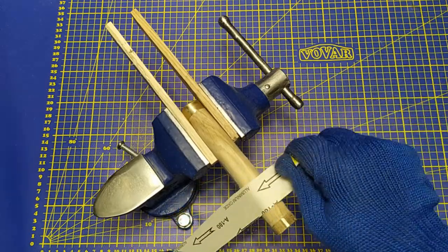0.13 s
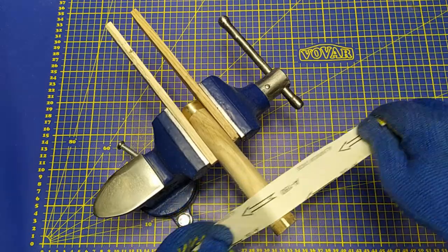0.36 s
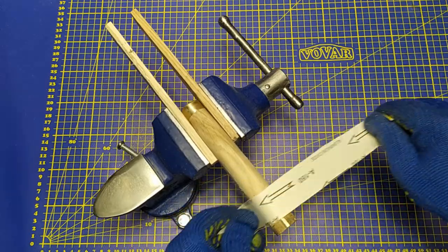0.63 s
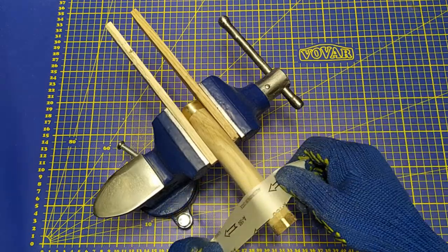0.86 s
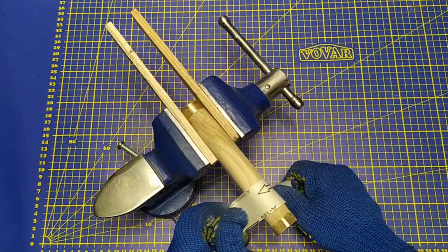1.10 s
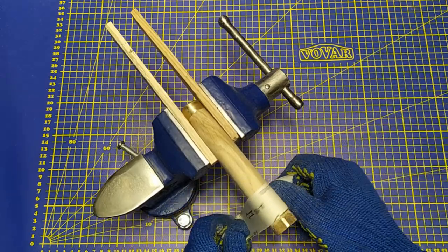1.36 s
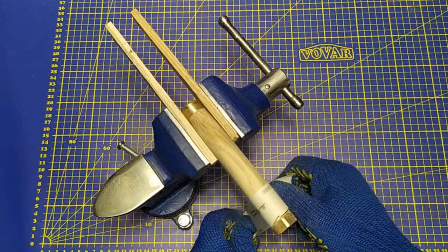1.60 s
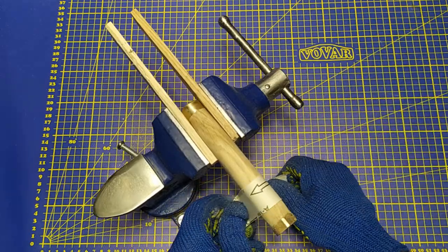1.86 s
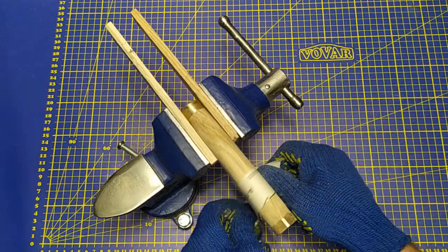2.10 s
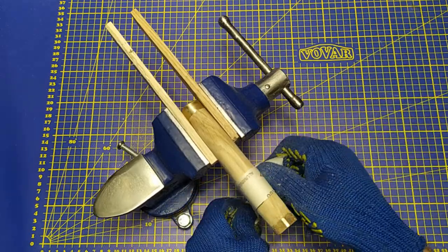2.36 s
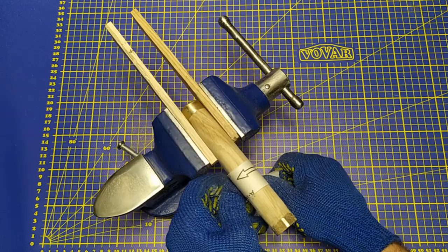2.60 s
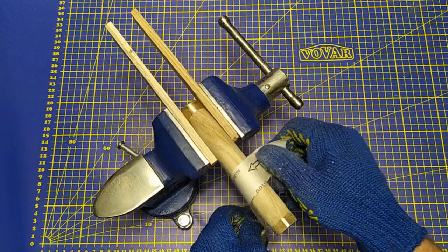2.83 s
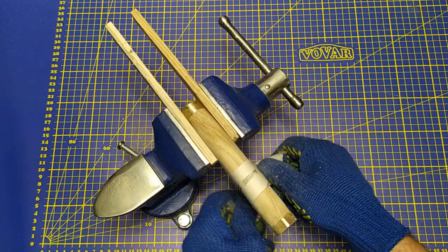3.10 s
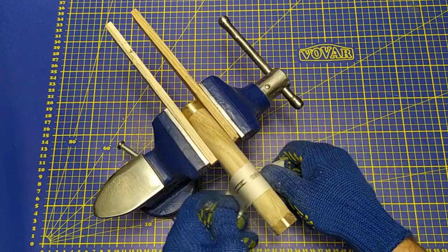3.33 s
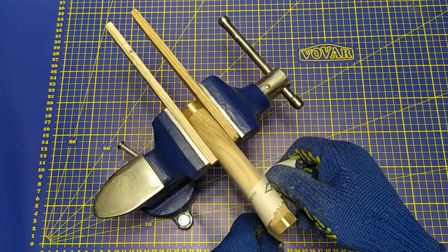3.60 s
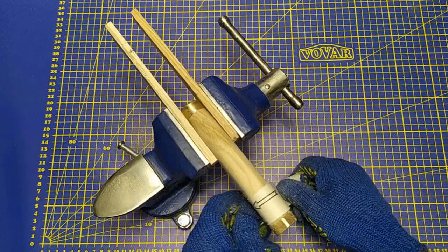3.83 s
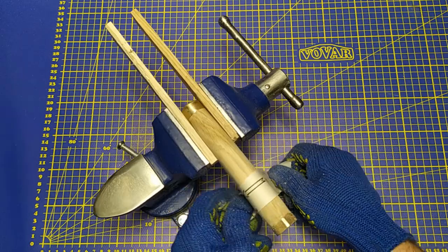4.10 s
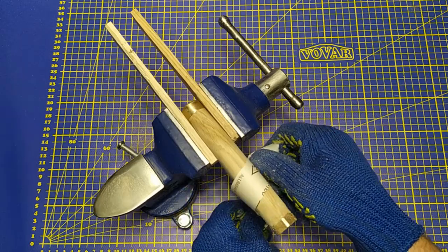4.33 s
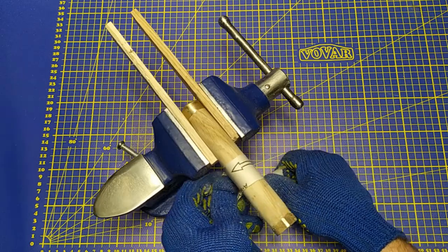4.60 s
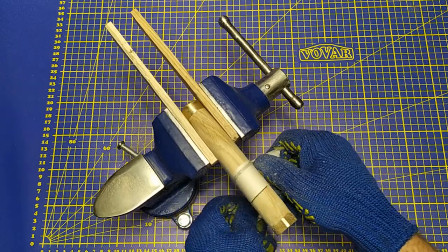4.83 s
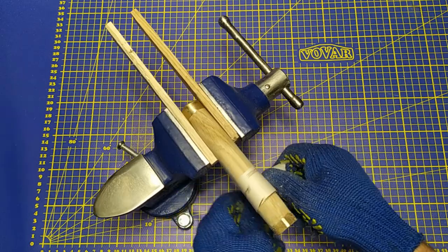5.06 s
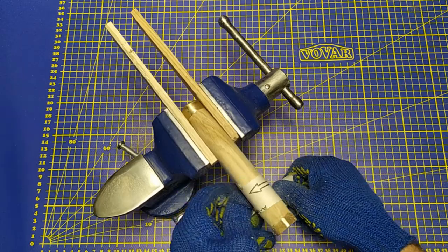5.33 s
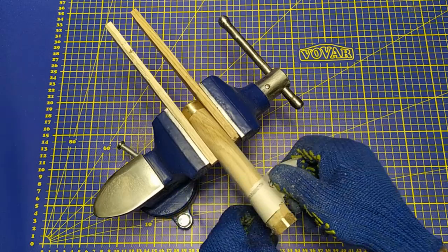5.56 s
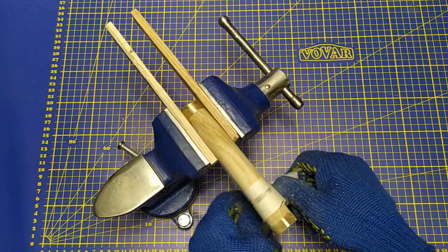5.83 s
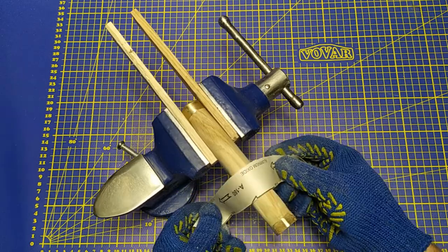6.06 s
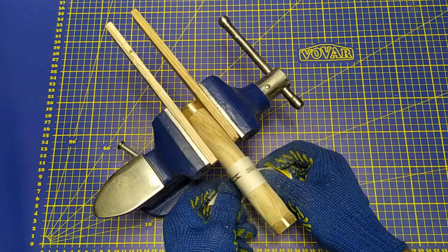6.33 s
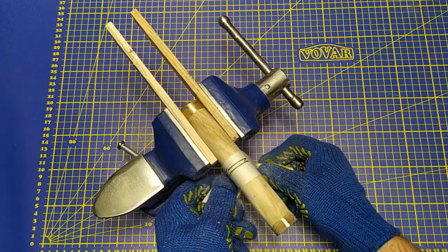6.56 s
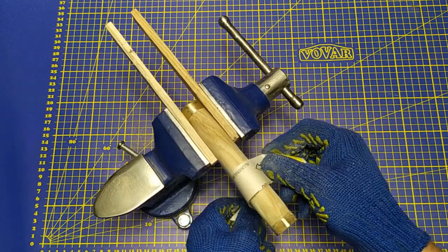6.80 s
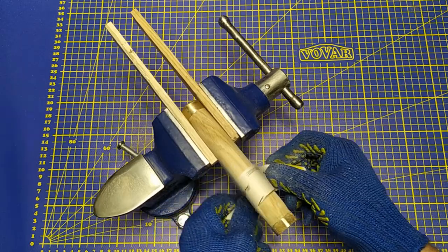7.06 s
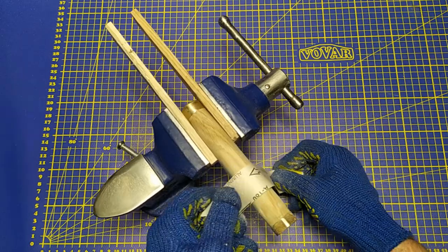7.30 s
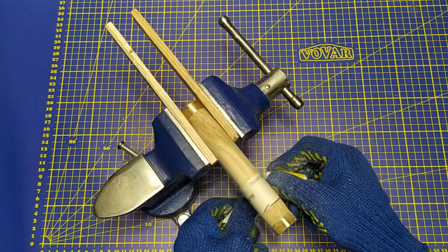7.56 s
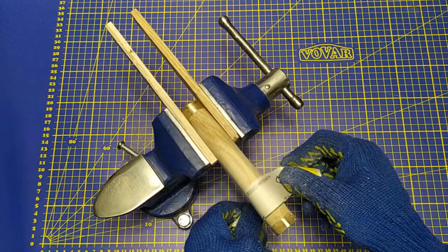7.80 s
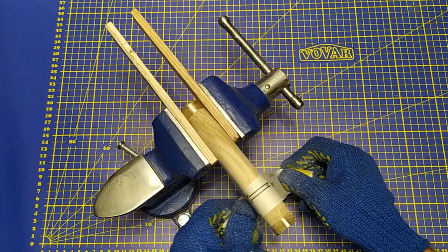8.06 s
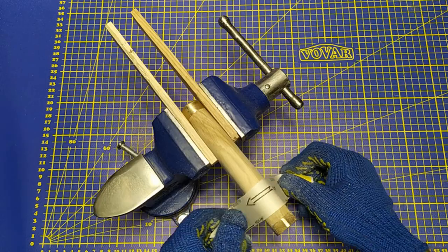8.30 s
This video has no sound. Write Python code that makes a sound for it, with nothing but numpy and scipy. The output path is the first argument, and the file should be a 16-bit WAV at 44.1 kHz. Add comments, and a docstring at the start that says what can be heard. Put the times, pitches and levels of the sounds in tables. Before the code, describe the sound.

Sanding is already under way at 0 s: a strip of sandpaper rubs back and forth around a clamped wooden handle, close and dry, in a small workshop. Each stroke is a short gritty rasp of about 0.15 s, bright and hissy with a faint hollow wooden ring, swelling quickly and choking off at the turn. Five or six come each second, slightly uneven. Soft low bench thuds fall at many turns. From 3 to 3.6 s the strokes grow fuller, with a firmer thump near 3.4 s; the heaviest thuds come near 4.9 and 5.7 s. Around 6.1 s the rubbing and bench ring stop abruptly, with small dry wood ticks in the gap. A slower-swelling, longer scrape starts at 6.2 s, then lighter, quicker, regular strokes run on to about 8.4 s, with only gentle bench nudges. A quiet low room hum lies beneath throughout.

```python
"""Sanding a wooden handle

A strip of sandpaper is pulled to and fro round a handle held in a bench vice, about five strokes a second.
Grit tears the wood in dense tiny clicks that ring the paper and the handle; at many turns the hands jolt
the bench, whose low modes thud. Noise and narrow wavering bands make a small workshop's quiet low hum;
a few dry wood ticks are decaying sines. Heard by a close pair of microphones.
"""
import sys
import numpy as np
from scipy import signal
from scipy.fft import rfft, irfft, next_fast_len
from scipy.io import wavfile
from scipy.ndimage import uniform_filter1d

SR = 44100
rng = np.random.default_rng(int(sys.argv[2]) if len(sys.argv) > 2 else 0)


def volts_from_decibels(level):
    """Turn decibel levels (scalar or array-like) into linear amplitude factors."""
    exponent = np.asarray(level, float) / 20
    return 10 ** exponent


def transcribe(signal):
    """Save signal, clipped to [-1, 1], as a 16-bit WAV file at the path in sys.argv[1]."""
    frames = np.atleast_2d(signal).T
    limited = np.clip(frames, -1, 1)
    pcm = np.round(limited * 32767).astype(np.int16)
    wavfile.write(sys.argv[1], SR, pcm)


N = 371322
T = np.arange(N) / SR
SIDES = np.array([[1], [-1]])  # left, right
STOP_S = 6.125  # earlier strokes, bench rings and room tails stop dead here

# strokes of the strip: start_s, slowing_s, rasp_db, speed_up_s, brightness_db
STROKES = [(-0.128, -0.003, -24.5, 0.021, -2.2), (0.021, 0.141, -23.3, 0.014, -2.2),
           (0.187, 0.314, -24, 0.014, -3.5), (0.347, 0.478, -22, 0.026, -6), (0.53, 0.666, -23, 0.02, -2.5),
           (0.7, 0.875, -24, 0.018, -5), (0.908, 1.07, -22, 0.032, -1), (1.125, 1.275, -21.8, 0.03, -1),
           (1.307, 1.462, -22.5, 0.027, 2), (1.504, 1.649, -22, 0.035, 4), (1.693, 1.854, -23.5, 0.026, 4),
           (1.89, 2.025, -23, 0.015, 1), (2.066, 2.203, -24, 0.018, 3.5), (2.233, 2.365, -22.5, 0.031, 0.5),
           (2.427, 2.569, -23, 0.021, 0.5), (2.61, 2.774, -22.5, 0.033, -3.5),
           (2.83, 2.97, -21.5, 0.032, 0), (3.004, 3.168, -20.5, 0.059, 0), (3.192, 3.353, -18, 0.077, 0.2),
           (3.403, 3.575, -21.3, 0.048, 0), (3.627, 3.768, -20, 0.018, -0.5),
           (3.81, 3.961, -21.5, 0.032, 2.5), (4.017, 4.144, -23.0, 0.016, 4.5),
           (4.165, 4.312, -22.5, 0.024, -1.5), (4.375, 4.509, -22, 0.018, 1.5),
           (4.534, 4.716, -22, 0.042, -4.5), (4.779, 4.91, -18.5, 0.051, 1.5),
           (4.985, 5.134, -23, 0.024, -2), (5.182, 5.306, -20.5, 0.019, 0.5),
           (5.363, 5.501, -22.5, 0.014, -0.5), (5.551, 5.672, -21.5, 0.019, 1),
           (5.708, 5.902, -22.5, 0.038, 2.5), (5.949, 6.085, -21.0, 0.025, 2.5),
           (6.228, 6.422, -20.5, 0.17, 2), (6.485, 6.613, -26, 0.01, -1.3),
           (6.664, 6.785, -23.5, 0.017, -2.0), (6.828, 6.968, -22, 0.018, 2.5),
           (7.005, 7.145, -24.5, 0.014, -3), (7.184, 7.304, -23, 0.015, 1.5),
           (7.355, 7.482, -23.0, 0.017, 1.5), (7.516, 7.66, -21.5, 0.02, 3.5),
           (7.707, 7.852, -24, 0.017, -1), (7.897, 8.012, -22, 0.011, 4.5),
           (8.062, 8.181, -23.5, 0.014, 1.5), (8.231, 8.35, -24, 0.0079, 3.5),
           (8.398, 8.499, -27, 0.007, 3)]
# grit snags and tears harder for a moment: centre_s, extra_db, length_s
SNAGS = [(0.741, 2.5, .028), (2.14, 1.5, .02), (3.69, 0, .02), (5.428, 4.5, 0.01), (6.267, 3, 0.015),
         (6.363, 2.5, 0.03), (6.535, 2, .04)]
# spectrum of the tearing: pitch_hz, density_db_per_hz
RASP_SPECTRUM = [(600, -34), (1000, -23.5), (1500, -20), (2200, -14), (2800, -10), (3400, -5.5), (4300, -3),
                 (6000, -4), (7800, -1.5), (10200, -4.5), (11700, -12.5), (12800, -20.5), (13100, -67)]
# left minus right of the tearing: pitch_hz, difference_db
LEAN = [(500, 4.5), (1000, 0), (2200, 0.3), (4500, 0.6), (8000, -4), (12000, 0)]
# resonances of the taut paper: pitch_hz, width_hz, level_db
PAPER_MODES = [(3400, 97, -12), (4170, 460, -11.5), (5200, 110, -31), (7540, 900, -14), (9330, 177, -6)]
# modes of the clamped handle: pitch_hz, width_hz, level_db
HANDLE_MODES = [(645, 580, -14), (995, 60, -9), (1168, 20, -2.5), (1436, 35, -11.5), (1696, 37, 7.5),
                (1839, 61, 3), (2150, 21, -11)]
# handle ring, drifting as the strip wanders along it: time_s, level_db
HANDLE_RING = [(0.0, -44.5), (1.0, -46.5), (2.0, -46), (2.7, -48.5), (3.2, -50), (3.9, -44.5), (4.8, -50.5),
               (5.6, -44), (6.5, -48.5), (7.3, -46.5), (7.8, -44.5), (8.42, -45.5)]
# hard jolts of the bench: time_s, level_db, share_above_160_hz_db
JOLTS = [(0.015, -40, -10), (0.183, -38, -17), (0.356, -33, -26), (0.713, -38, -6), (0.867, -36.5, -13),
         (1.275, -31, -12), (1.846, -35.5, -13), (2.021, -35.5, -11), (2.2, -31, -9), (2.56, -32.5, -10),
         (2.775, -35, -13), (2.967, -30.5, -10.5), (3.168, -31.5, -14), (3.365, -26.5, -12),
         (3.763, -36, -7), (4.144, -37.5, -7), (4.506, -35, -8), (4.718, -33.5, -19), (4.926, -23, -18),
         (5.316, -29, -19), (5.495, -38, -7), (5.675, -22, -15.5), (5.89, -38, -6), (6.095, -29.5, -5.5)]
# modes of the bench top: pitch_hz, level_db, t60_s
BENCH_MODES = [(57, 3.5, 0.41), (95, 4.5, 0.16), (102.4, 5.5, 0.26), (120, -0.5, 0.21), (145, -7.5, 0.33),
               (175.2, 1, 0.25), (231.5, -0.5, 0.23), (335, 0, 0.19), (395, 2.5, 0.088)]
# bench rocking under the pull: time_s, lowest_mode_db, second_mode_db
ROCK = [(0.0, -43, -56), (0.43, -56, -43.5), (1.24, -50.5, -53), (2.59, -56, -54), (3.0, -44, -61),
        (3.4, -45, -49), (4.23, -64, -56.5), (5.01, -45.5, -51), (5.76, -44.5, -47), (6.12, -41, -52),
        (6.13, -54, -54), (6.42, -74, -55), (6.9, -42, -57), (7.3, -53, -51.5), (8.42, -53, -50.5)]
# spectrum of the room noise: pitch_hz, density_db_per_hz
SHOP_SPECTRUM = [(76, -31), (130, -2), (204, -19.5), (253, -5.5), (298, -13), (409, 0), (462, -10),
                 (635, -2.5), (711, -11), (996, -4), (1160, -9), (1250, -10), (1500, -11), (1950, -36),
                 (3300, -120)]
# slow swell of the room noise: time_s, level_db
SHOP_SWELL = [(0.0, -48.5), (0.68, -52), (3.7, -54), (4.17, -50), (4.62, -54), (8.42, -53)]
# narrow hums: pitch_hz, width_hz, level_db
HUMS = [(40, 8.4, -59), (135, 21, -67.5), (170, 8.8, -63.5), (247.7, 8.1, -63), (435, 13, -68.5),
        (507.6, 12.5, -64.5), (647.4, 13, -66)]
# wood ticks, one ring a row: time_s, level_db, pitch_hz, t60_s
TICKS = [(6.087, -37, 375, 0.025), (6.173, -36.5, 1270, 0.022), (6.173, -44, 600, 0.012)]


def level(x, rms_db):
    """Scale to an rms level."""
    return x * volts_from_decibels(rms_db) / np.sqrt(np.mean(x ** 2))


def colour(x, points):
    """Shape the spectrum by (Hz, dB) points, joined along log frequency."""
    hz, db = np.transpose(points)
    size = next_fast_len(N)
    bins_hz = np.maximum(np.fft.rfftfreq(size, 1 / SR), 1)
    gain_db = np.interp(np.log(bins_hz), np.log(hz), db)
    return irfft(rfft(x, size) * volts_from_decibels(gain_db), size)[..., :N]


def ring(x, hz, width_hz):
    """One resonance, gain 1 at its centre."""
    return signal.lfilter(*signal.iirpeak(hz, hz / width_hz, fs=SR), x)


def decay(t, t60_s):
    """Exponential fall of 60 dB in t60_s."""
    return np.exp(-np.log(1000) * t / t60_s)


def walk(rate_hz):
    """Random levels held 1 / rate_hz s and slewed twice; spread about 0.7."""
    hold = int(SR / rate_hz)
    steps = np.repeat(rng.standard_normal(N // hold + 1), hold)
    return 0.98 * uniform_filter1d(uniform_filter1d(steps, hold), hold)[:N]


def curve(table):
    """Columns of a (s, ..) table at every sample."""
    s, *columns = np.transpose(table)
    return [np.interp(T, s, column) for column in columns]


def strokes():
    """Rasp level and brightness in dB: each stroke speeds up, slackens, brakes; the next starts over its tail."""
    creep_db = -49.5  # the paper never lies quite still
    ease = 1.48  # exponent: the hands start gently, then speed up
    sag_db_per_s, slowing_db_per_s = 13, 343  # the pull slackens; the rasp dies as the hands brake
    grip_s, slip_s = 0.005, 0.004  # after a turn the grit holds for a moment, then breaks loose
    power, bright_db = np.full(N, volts_from_decibels(2 * creep_db)), np.zeros(N)
    for start_s, brake_s, rasp_db, rise_s, stroke_bright_db in STROKES:
        limit_s = STOP_S if start_s < STOP_S else N / SR
        end_s = min(brake_s + 0.2, limit_s)
        now = slice(max(int(start_s * SR), 0), int(end_s * SR))
        t = np.maximum(T[now] - start_s, 0)
        braking_s = np.maximum(T[now] - brake_s, 0)
        pull_db = rasp_db - sag_db_per_s * (t - braking_s) - slowing_db_per_s * braking_s
        speed_up = (1 - np.exp(-t / rise_s)) ** ease
        loose = np.clip((t - grip_s) / slip_s, 0, 1)
        power[now] += (speed_up * volts_from_decibels(pull_db) * loose) ** 2
        bright_db[now] = stroke_bright_db
    return 10 * np.log10(power), uniform_filter1d(bright_db, size=1500)


def grit(spread_db):
    """One tearing grain a sample, most tiny, a few large."""
    size_db = spread_db * np.minimum(rng.exponential(size=N), 6.0)
    return level(rng.standard_normal(N) * volts_from_decibels(size_db), 0)


def nearby(x, t60_s, echo_db, hop):
    """Echoes off hands, vice and bench top; they change as the strip slides and differ left and right."""
    count = N // hop + 2
    padded = np.pad(x, (hop, 2 * hop))
    frames = np.lib.stride_tricks.sliding_window_view(padded, 2 * hop)[::hop][:count]
    window = np.sin(np.pi * np.arange(2 * hop) / (2 * hop))
    paths = rng.standard_normal((2, count, 2 * hop)) * decay(T[:2 * hop], t60_s)
    paths *= volts_from_decibels(echo_db) / np.sqrt(np.sum(paths ** 2, axis=2, keepdims=True))
    # direct sound, two samples later on the left
    paths[0, :, 2] += 1
    paths[1, :, 0] += 1
    pieces = signal.fftconvolve(paths, (frames * window)[None], axes=2)
    out = np.zeros((2, (count + 4) * hop))
    for k in range(count):
        out[:, k * hop:(k + 4) * hop - 1] += pieces[:, k]
    return out[:, hop:hop + N] / np.sqrt(1 + volts_from_decibels(echo_db) ** 2)


def tilt(x, tilt_db):
    """Move the balance about 6 kHz, not the loudness."""
    low = signal.sosfiltfilt(signal.butter(1, 6000, "low", fs=SR, output="sos"), x)
    high = signal.sosfiltfilt(signal.butter(1, 6000, "high", fs=SR, output="sos"), x)
    lift = volts_from_decibels(tilt_db / 2)
    power = np.mean(low ** 2) / lift ** 2 + np.mean(high ** 2) * lift ** 2 + 2 * np.mean(low * high)
    return (low / lift + high * lift) / np.sqrt(power)


def sanding():
    """Grain clicks follow the stroke speed and ring paper and handle."""
    rasp_db, bright_db = strokes()
    for s, extra_db, length_s in SNAGS:
        rasp_db = rasp_db + extra_db * np.exp(-(2 * (T - s) / length_s) ** 4)
    scuff = volts_from_decibels(0.73 * walk(60))
    near = nearby(grit(spread_db=2.5) * scuff, t60_s=0.07, echo_db=9.0, hop=2600)
    # the two ends of the strip each rustle into their own microphone
    ends = np.array([grit(spread_db=3.0), grit(spread_db=2.0)])
    grains = near + volts_from_decibels(-7.0) * scuff * ends
    lean_left = [(hz, db / 2) for hz, db in LEAN]
    lean_right = [(hz, -db / 2) for hz, db in LEAN]
    grains = np.array([colour(grains[0], lean_left), colour(grains[1], lean_right)])

    tear = colour(grains, RASP_SPECTRUM)
    paper_ring = sum(volts_from_decibels(db) * ring(tear, hz, width_hz) for hz, width_hz, db in PAPER_MODES)
    paper = level(1.07 * tear + paper_ring, 0)
    # slow paper near the turns sounds duller
    slack_db = rasp_db - np.median(rasp_db)
    paper = tilt(paper, bright_db + 0.9 * slack_db + 0.34 * walk(25))

    drive = grains * volts_from_decibels(0.9 * np.minimum(slack_db, 0))
    handle = level(sum(volts_from_decibels(db) * ring(drive, hz, width_hz) for hz, width_hz, db in HANDLE_MODES), 0)
    handle_db = curve(HANDLE_RING)[0] + 1.0 * walk(11)
    return paper * volts_from_decibels(rasp_db) + handle * volts_from_decibels(handle_db)


def room(x, t60_s, wet_db):
    """A short diffuse tail, different in each ear, cut at STOP_S."""
    t = T[:int(0.4 * SR)]
    tail = rng.standard_normal((2, len(t))) * decay(t, t60_s) * (t > 0.003)
    tail *= volts_from_decibels(wet_db) / np.sqrt(np.sum(tail ** 2, axis=1, keepdims=True))
    before = T < STOP_S
    wet_before = signal.fftconvolve(x * before, tail, axes=1)[:, :N]
    wet_after = signal.fftconvolve(x * ~before, tail, axes=1)[:, :N]
    return (x + wet_before * before + wet_after) / np.sqrt(1 + volts_from_decibels(wet_db) ** 2)


def bench():
    """Each jolt swells for a moment in the heavy top, then rings out; the pull keeps it rocking."""
    low_share_db = -9  # share of the lowest mode in a jolt
    out = np.zeros(N)
    hz, mode_db, t60_s = np.transpose(BENCH_MODES)[:, :, None]
    # every braking of the hands nudges the bench a little
    brakes_s = [row[1] for row in STROKES if 0.01 < row[1] < N / SR]
    nudges = [(s, -46.5 + rng.standard_normal(), -13) for s in brakes_s]
    hits = list(JOLTS) + nudges
    # no two jolts land alike
    detune = 1 + 0.017 * rng.standard_normal((len(hits), len(BENCH_MODES), 1))
    for (s, db, knock_db), shift in zip(hits, detune):
        start = int((s - 0.008) * SR)
        stop = int(STOP_S * SR) if s < STOP_S else N
        t = T[:min(stop - start, SR)]
        gains = volts_from_decibels(db + mode_db + low_share_db * (hz < 70) + knock_db * (hz > 160))
        modes = gains * decay(t, t60_s) * np.sin(2 * np.pi * hz * shift * t)
        swell = (1 - np.exp(-t / 0.011)) ** 2
        out[start:start + len(t)] += 0.8 * swell * modes.sum(axis=0)
    for rock_db, (rock_hz, width_hz) in zip(curve(ROCK), [(57, 8.1), (101, 12.3)]):
        narrow = ring(rng.standard_normal(N), rock_hz, width_hz)
        rocking = level(ring(narrow, rock_hz, 3 * width_hz), 0)
        out += volts_from_decibels(rock_db + 2.5 * walk(9)) * rocking
    return out * volts_from_decibels(0.99 * SIDES)  # a little louder left


def shop():
    """Room noise that swells slowly, a faint hiss and narrow wavering hums, alike left and right in the bass."""
    mid, side = rng.standard_normal((2, N))
    side = signal.sosfilt(signal.butter(2, 450, "high", fs=SR, output="sos"), side)
    air_db = curve(SHOP_SWELL)[0] + 1.8 * walk(6)
    air = level(colour(mid + 0.58 * side * SIDES, SHOP_SPECTRUM), 0) * volts_from_decibels(air_db)
    hiss = level(ring(rng.standard_normal((2, N)), 2700, 2200), -66.0)
    hums = sum(level(ring(rng.standard_normal(N), hz, width_hz), db) for hz, width_hz, db in HUMS)
    return air + hiss + hums


def ticks():
    """Small dry ticks of wood, each a quickly decaying sine."""
    out = np.zeros(N)
    t = T[:SR // 10]
    for s, db, hz, t60_s in TICKS:
        start = int(s * SR)
        out[start:start + len(t)] -= volts_from_decibels(db) * decay(t, t60_s) * np.sin(2 * np.pi * hz * t)
    return out


def scene():
    """Sanding in the room, over bench, shop and ticks."""
    rasp = room(sanding(), t60_s=0.09, wet_db=-17)
    return rasp + bench() + shop() + ticks()


def band_limit(x):
    """A steep low-pass at the top of the band."""
    return signal.sosfilt(signal.butter(12, 13690, fs=SR, output="sos"), x)


def record(dry):
    """The whole mix is raised a little, and the microphones drop the deepest bass."""
    deep_cut = signal.butter(4, 36, "high", fs=SR, output="sos")
    mix = signal.sosfilt(deep_cut, volts_from_decibels(0.76) * dry)
    return band_limit(mix)


dry = scene()
out = record(dry)
transcribe(out)
```